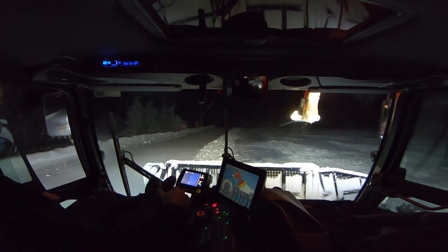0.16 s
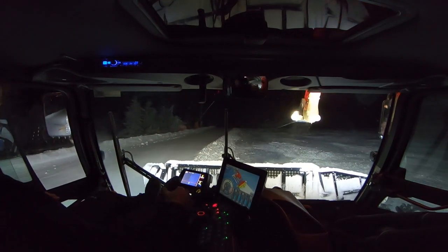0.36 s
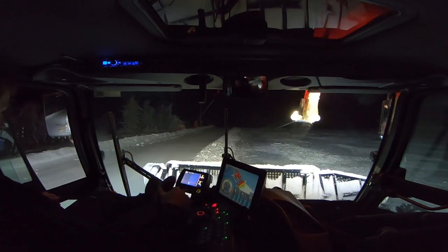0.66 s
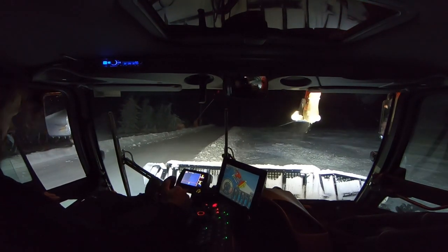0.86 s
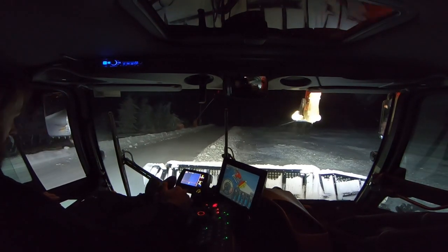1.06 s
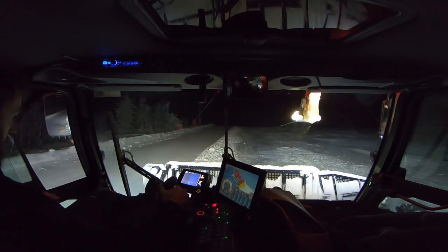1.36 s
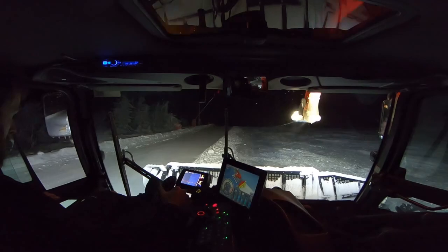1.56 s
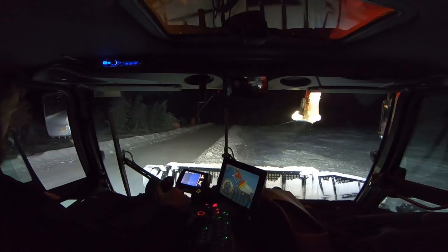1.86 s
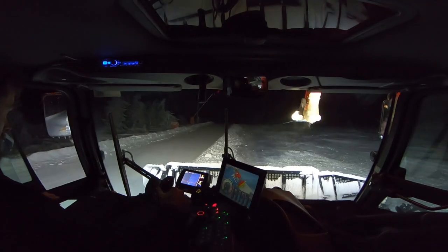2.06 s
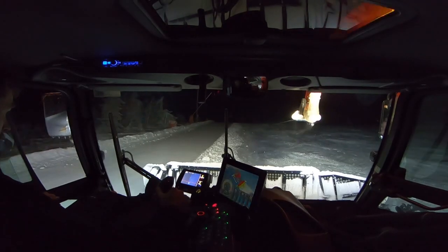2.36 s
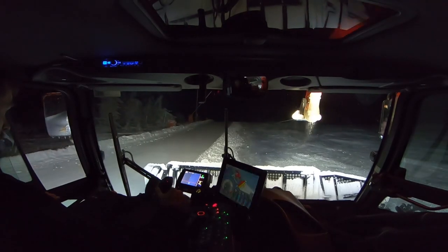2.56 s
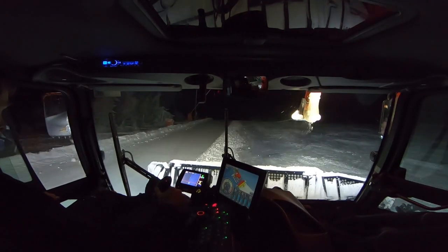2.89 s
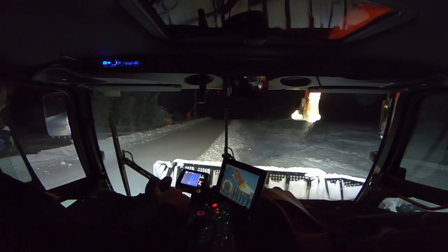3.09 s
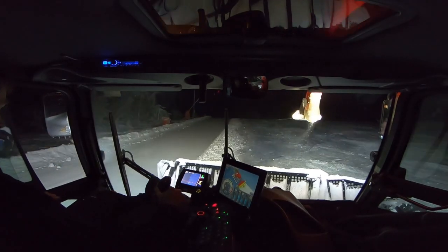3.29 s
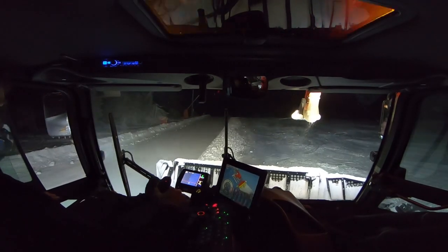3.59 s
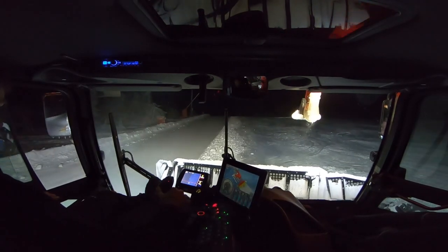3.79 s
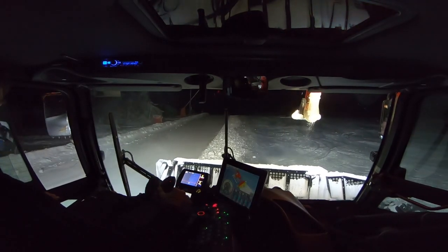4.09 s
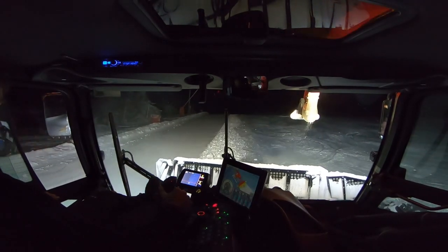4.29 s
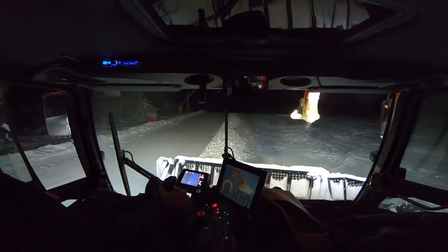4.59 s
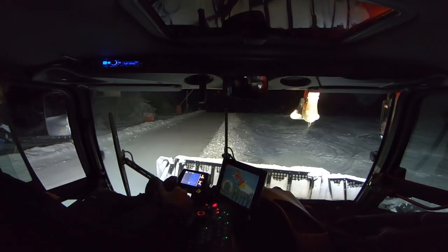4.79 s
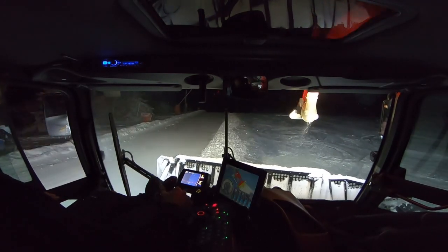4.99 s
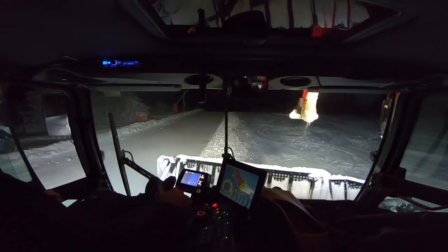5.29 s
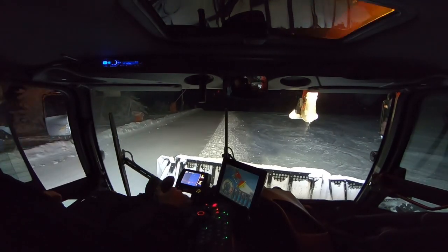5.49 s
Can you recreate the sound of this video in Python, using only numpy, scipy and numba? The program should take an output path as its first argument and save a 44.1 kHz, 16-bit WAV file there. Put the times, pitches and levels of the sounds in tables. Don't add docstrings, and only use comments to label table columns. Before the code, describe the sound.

Inside a tracked snow groomer's cab, a loud wavering two-note hydraulic hum drones over deep rumbling boom and engine knock.

```python
import sys
import numpy as np
from scipy import signal
from scipy.fft import rfft, irfft
from scipy.io import wavfile
from scipy.ndimage import uniform_filter1d
from numba import njit

SR = 44100
rng = np.random.default_rng(int(sys.argv[2]) if len(sys.argv) > 2 else 0)


def amplitude_ratio(level_db):
    exponent = np.asarray(level_db, float) / 20
    return 10 ** exponent


def unload_wav(signal):
    wavfile.write(
        sys.argv[1],
        SR,
        np.round(np.clip(np.atleast_2d(signal).T, -1, 1) * 32767).astype(np.int16),
    )


N = 249165


def level(x, db):
    return x * amplitude_ratio(db) / np.sqrt(np.mean(x ** 2))


def curve(table):
    time_s, value = np.transpose(table)
    return np.interp(np.arange(N) / SR, time_s, value)


def spectrum_hz():
    return np.maximum(np.arange(N // 2 + 1) * SR / N, 1.)


def resonance(x, hz, width_hz, order=1):
    f = spectrum_hz()
    return irfft(rfft(x) / (1 + 1j * (f - hz ** 2 / f) / width_hz) ** order, N)


def walk(rate):
    hold = int(SR / rate)
    held = np.repeat(rng.standard_normal(N // hold + 1), hold)
    return 1.316 * uniform_filter1d(uniform_filter1d(held, hold), hold)[:N]


def tone(turns, db):
    waver_db = .8 * walk(6)
    slip = .025 * walk(9)
    phase = 2 * np.pi * (turns + slip + rng.random())
    return np.sqrt(2) * amplitude_ratio(db + waver_db) * np.sin(phase)


# time_s, piston_rate_hz
SHAFT_SPEED = [(0.0, 284.0), (0.34, 286.8), (0.51, 286.3), (0.86, 281.3), (1.1, 281.1), (1.54, 279.4),
               (1.75, 277.8), (2.23, 273.4), (2.4, 275.0), (2.91, 275.9), (3.08, 278.5), (3.27, 280.0),
               (3.62, 284.3), (4.11, 285.1), (4.45, 284.6), (4.97, 280.2), (5.16, 280.0), (5.48, 286.7)]


def shaft():
    return np.cumsum(curve(SHAFT_SPEED)) / SR


CAB_AT_HZ = [273.5, 276, 278, 279.6, 281, 283, 285, 287]
MAIN_PUMP_DB = [-21, -22.5, -26.5, -35.5, -27, -21, -18.5, -18]
MAIN_PUMP_OCTAVE_DB = [-37, -38, -35, -36, -35.5, -34.5, -36, -38.5]
SECOND_PUMP_DB = [-33.5, -34, -35, -33.5, -27.5, -32, -29, -26.5]
SECOND_PUMP_OCTAVE_DB = [-56, -51, -50.5, -42.5, -48, -41.5, -44.5, -46]
SECOND_PUMP_OVERTONES_DB = [-51, -62, -68, -72.5]
# time_s, level_db
PRESSURE = [(0.0, 0), (0.4, 1), (0.8, 0.5), (1.15, 0.5), (1.5, -1), (1.9, 0.5), (2.5, -0.5), (2.9, -1),
            (3.15, 0.5), (3.45, 1), (3.7, -1.5), (4.1, 1), (4.5, -1), (4.85, 2.5), (5.15, -2.5), (5.4, -2),
            (5.65, -2)]
GEARED_RATIO = [3, 2.262, 1.722, 4.777, 9.555, 14.336]
GEARED_DB = [-56.5, -50.5, -55, -61, -62, -77]


def pumps(turns):
    second = 1.157
    ripples = [(1, MAIN_PUMP_DB), (2, MAIN_PUMP_OCTAVE_DB),
               (second, SECOND_PUMP_DB), (2 * second, SECOND_PUMP_OCTAVE_DB)]
    rate_hz = np.gradient(turns) * SR
    pressure_db = curve(PRESSURE)
    out = np.zeros(N)
    for ratio, heard_db in ripples:
        cab_db = np.interp(rate_hz, CAB_AT_HZ, heard_db)
        out += tone(ratio * turns, cab_db + pressure_db)
    for overtone, db in enumerate(SECOND_PUMP_OVERTONES_DB, start=3):
        out += tone(overtone * second * turns, db)
    for ratio, db in zip(GEARED_RATIO, GEARED_DB):
        out += tone(ratio * turns, db)
    return out


CYLINDERS_DB = [-5, -7, -6.5]
# pitch_hz, width_hz, level_db
BLOCK = [(100, 25, -3.5), (168, 28, -2.5), (380, 49, -12), (1050, 680, -37), (1110, 300, -43),
         (3400, 430, -46.5)]


def engine(turns):
    crank_ratio = .11747
    firings = len(CYLINDERS_DB) * crank_ratio * turns
    number = firings.astype(int)
    at = np.flatnonzero(np.diff(number))
    cylinder_db = np.array(CYLINDERS_DB)[number[at] % len(CYLINDERS_DB)]
    scatter_db = 2.1 * rng.standard_normal(len(at))
    pulses = np.zeros(N)
    pulses[at] = amplitude_ratio(cylinder_db + scatter_db)
    pulses = resonance(pulses, 1375, 4000, order=4)
    knock = np.zeros(N)
    for k, (hz, width_hz, db) in enumerate(BLOCK):
        knock += (-1) ** k * level(resonance(pulses, hz, width_hz), db)
    gas = np.exp(-(firings % 1) / 1.4) * rng.standard_normal(N)
    rasp = resonance(gas, 2600, 2400, order=4)
    return amplitude_ratio(-28.0) * knock + level(rasp, -57.5)


def boom(hz, width_hz):
    f = np.fft.fftfreq(N, 1 / SR)
    chance = np.fft.ifft(np.fft.fft(rng.standard_normal(N)) / (1 + (2 * f / width_hz) ** 2))
    size = np.abs(chance) ** 2
    steady = .75
    chance = chance / (size + 0.17 * size.mean()) ** (steady / 2)
    carrier = np.exp(2j * np.pi * np.cumsum(hz) / SR)
    return level(np.real(chance * carrier), -0.5)


# pitch_hz, resting_level_db, wander_hz, jolt_length_s
CAB_PARTS = [
    (24.9, -29, 3, 0.098),
    (100.77, -25, 4, .05),
    (164.2, -25, 4, .04),
    (183.25, -24.5, 4, 0.026),
]
CAB_WIDTH_HZ = [12, 22, 33, 30]
# time_s, level_db
FLOOR_JOLTS = [(.73, -25), (1.55, -26), (2.03, -26), (3.0, -25), (3.8, -25.5), (4.3, -25), (4.68, -23),
               (5.1, -23), (5.3, -25)]
SEAT_JOLTS = [(.66, -19.5), (1.04, -23), (1.471, -17.5), (1.63, -24), (1.769, -20.5), (1.93, -18.5),
              (3.02, -24.5), (3.35, -22), (3.92, -17), (4.171, -18.5), (4.34, -16.5), (4.62, -18),
              (5.6, -14.5)]
PANEL_JOLTS = [(.13, -23), (.27, -25), (.5, -22), (.59, -24), (1.04, -22.5), (1.25, -21.5), (1.61, -22.5),
               (1.73, -22), (2.06, -21), (2.24, -25), (2.36, -23), (2.62, -24.5), (2.79, -23), (3.13, -23),
               (3.3, -21.5), (3.49, -21.5), (3.731, -23.5), (4.05, -23.5), (4.6, -23), (4.72, -25),
               (4.9, -23.5), (5.18, -20.5)]


def tracks():
    scatter_db, shake_rate = 1.5, 10
    t, out = np.arange(N) / SR, np.zeros(N)
    jolts = [FLOOR_JOLTS, SEAT_JOLTS, PANEL_JOLTS, PANEL_JOLTS]
    for part, width_hz, rows in zip(CAB_PARTS, CAB_WIDTH_HZ, jolts):
        hz, rest_db, wander_hz, length_s = part
        power = amplitude_ratio(rest_db + scatter_db * walk(shake_rate)) ** 2
        for time_s, db in rows:
            power += amplitude_ratio(db) ** 2 * np.exp(-((t - time_s) / length_s) ** 2)
        out += np.sqrt(power) * boom(hz + wander_hz * walk(shake_rate), width_hz)
    return out


# time_s, peak_level_db, pitch_hz
TICKS = [
    (1.7204, -58, 6580),
    (1.8861, -54, 7050),
    (2.799, -47, 7610),
]


def ticks():
    out, t = np.zeros(N), np.arange(400) / SR
    shape = t / 0.00061 * np.exp(1 - t / 0.00087)
    for time_s, db, hz in TICKS:
        ring = np.sin(2 * np.pi * hz * t)
        ring += .6 * np.sin(2 * np.pi * .76 * hz * t)
        ring += .03 * np.sin(2 * np.pi * 1.57 * hz * t)
        i = int((time_s - .0007) * SR)
        out[i:i + len(t)] += amplitude_ratio(db - 5.0) * ring * shape
    return out


# pitch_hz, level_db (per Hz)
ROAR = [(14, -12.5), (30, 0.5), (130, -5), (245, -0.5), (262, -4.5), (400, -10), (500, -15), (680, -21.5),
        (800, -27.5), (2000, -34.5), (3700, -41.5), (5000, -52.5), (8500, -67), (10500, -82.5)]


def roar():
    f = spectrum_hz()
    hz, db = np.transpose(ROAR)
    colour = amplitude_ratio(np.interp(np.log(f), np.log(hz), db, left=-60, right=-110))
    spectrum = rfft(rng.standard_normal(N)) * colour
    out, swell = np.zeros(N), walk(0.3)
    for centre in np.arange(3.5, 15, .5):
        share = np.clip(1 - np.abs(np.log2(f) - centre) / .5, 0, 1)
        flicker_db = 0.13 * swell + 1.2 * walk(9)
        out += amplitude_ratio(flicker_db) * irfft(spectrum * share, N)
    return level(out, -20.5)


# pitch_hz, width_hz, level_db
DUCTS = [(36.5, 33, -37.5), (63.7, 5, -34), (365, 4.3, -42.5), (586.3, 24, -47.5), (680, 60, -56),
         (928, 40, -49), (1012, 160, -44), (1140, 70, -51), (1280, 200, -48), (1590, 110, -56.5),
         (3363, 610, -51), (7760, 1600, -73.5)]
# pitch_hz, width_hz, level_db
WHINE = [(11032, 50, -85), (11100, 350, -88.5), (12966, 90, -93), (12100, 1100, -96)]


def ducts_and_whine():
    out = np.zeros(N)
    for hz, width_hz, db in DUCTS + WHINE:
        out += level(resonance(rng.standard_normal(N), hz, width_hz, order=2), db)
    return out


def scene():
    turns = shaft()
    mix = pumps(turns) + engine(turns) + tracks() + ticks() + roar() + ducts_and_whine()
    return mix[None]


@njit
def follow(x, attack, release):
    e, out = .2, np.empty(len(x))
    for i in range(len(x)):
        a = abs(x[i])
        e += (a - e) * (attack if a > e else release)
        out[i] = e
    return out


def band_limit(x):
    return signal.sosfilt(signal.butter(12, 15000, fs=SR, output="sos"), x)


def record(dry):
    attack_s, release_s = 0.0076, 0.054
    envelope = follow(dry[0], 1 / (attack_s * SR), 1 / (release_s * SR))
    envelope = uniform_filter1d(uniform_filter1d(envelope, size=60), size=60)
    gain = (amplitude_ratio(-8.5) / (envelope + 0.033)) ** 0.12
    held = dry * gain * amplitude_ratio(-0.38)
    held = signal.sosfilt(signal.butter(2, 11, "high", fs=SR, output="sos"), held)
    mix = .9 * np.tanh(held / .9)
    return band_limit(mix)


dry = scene()
out = record(dry)
unload_wav(out)
```